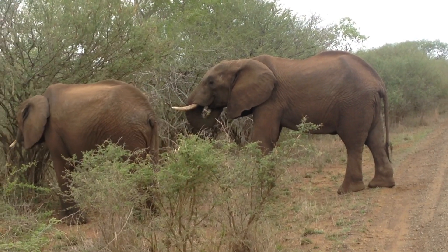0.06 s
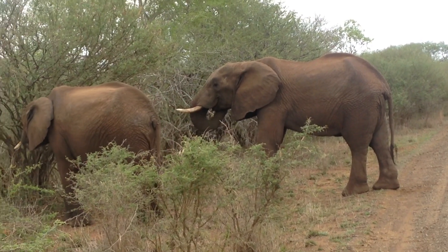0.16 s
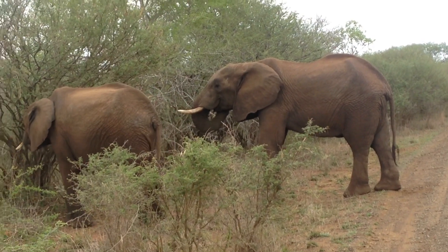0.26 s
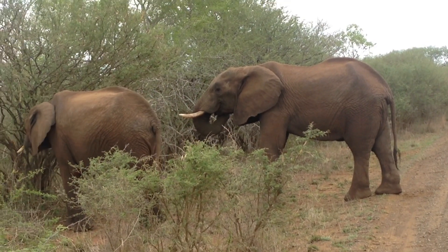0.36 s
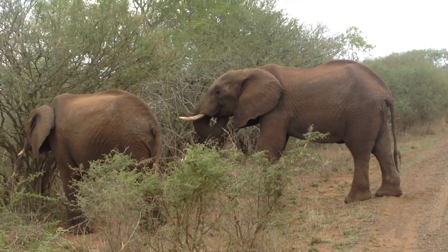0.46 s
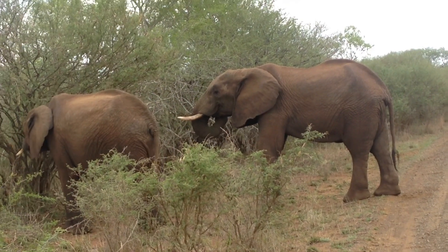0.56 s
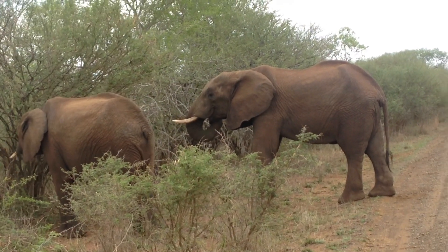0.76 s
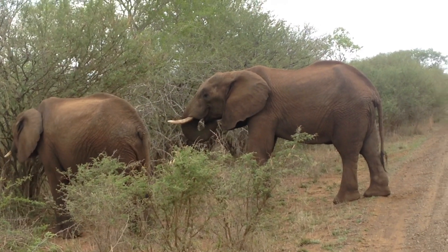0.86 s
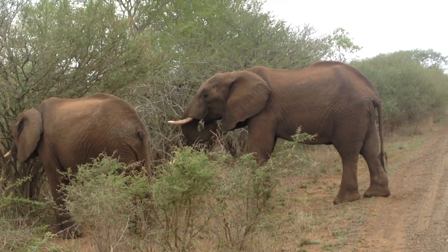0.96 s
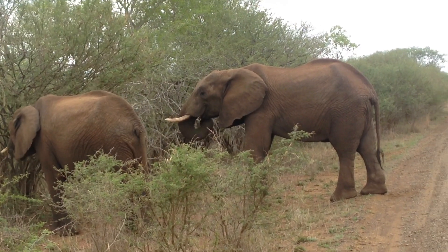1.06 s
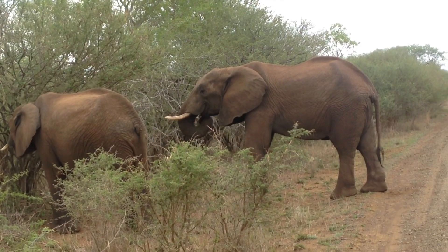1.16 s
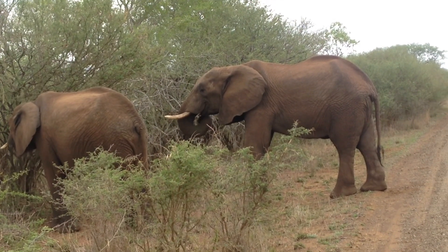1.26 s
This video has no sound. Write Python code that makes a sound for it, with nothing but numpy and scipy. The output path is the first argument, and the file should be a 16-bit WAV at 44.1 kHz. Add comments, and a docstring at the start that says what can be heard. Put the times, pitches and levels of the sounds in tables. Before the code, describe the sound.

Dry twigs crack and foliage rustles around elephants, with soft wind on the microphone.

```python
"""In dry thorn bush, elephants push through: twigs snap, and leaves rustle as the branches spring back.
Each snap is a crack and a splintering that rings the wood; rustle and tearing bark are dense ticks over
hiss. Soft low buffets of air hit the microphone, over a faint hiss of wind and a far bird's run of
rising chirps. Stems and ground scatter the snaps and the chirps."""
import sys
import numpy as np
from scipy import signal
from scipy.fft import rfft, irfft
from scipy.io import wavfile

SR = 44100
rng = np.random.default_rng(int(sys.argv[2]) if len(sys.argv) > 2 else 0)


def log_audio(samples):
    """Write samples as a 16-bit WAV file to the path given in sys.argv[1]."""
    # one column per channel
    frames = np.atleast_2d(samples).T
    # limit to full scale, then quantise
    limited = np.clip(frames, -1, 1)
    pcm = np.round(limited * 32767).astype(np.int16)
    wavfile.write(sys.argv[1], SR, pcm)


N = 57330
T = np.arange(N) / SR
HZ = np.maximum(np.arange(N // 2 + 1) * SR / N, 1)


def from_db(db):
    """Decibels to gain."""
    return 10 ** (np.asarray(db) / 20)


def rms_one(x):
    """Scale to unit rms."""
    return x / np.sqrt(np.mean(x ** 2) + 1e-20)


def filtered(x, kind, hz, order=2):
    """Butterworth filter."""
    return signal.sosfilt(signal.butter(order, np.clip(hz, 10, .45 * SR), kind, fs=SR, output="sos"), x)


def coloured(x, spectrum):
    """EQ a steady sound with a curve of (frequency [Hz], level [dB]) points; rms 1."""
    hz, db = np.transpose(spectrum)
    gain = from_db(np.interp(np.log(HZ), np.log(hz), db))
    return rms_one(irfft(rfft(x) * gain, N))


def even_noise(gain):
    """Noise shaped by a gain per frequency, with its swells evened out; rms 1."""
    analytic = signal.hilbert(irfft(rfft(rng.standard_normal(N)) * gain, N))
    levelled = analytic.real / (abs(analytic) + 1e-12)
    return rms_one(irfft(rfft(levelled) * np.sqrt(gain), N))


def add(out, s, sound):
    """Mix a sound in at s seconds."""
    i = int(max(s, 0) * SR)
    out[i:i + len(sound)] += sound[:max(N - i, 0)]


def crackle(envelope, spectrum, ticks_per_s, spread_db, hiss):
    """Dense ticks of uneven size over a friction hiss, riding a level envelope."""
    sizes = rng.choice([-1, 1], N) * from_db(spread_db * np.minimum(rng.exponential(1, N), 4))
    ticks = (rng.random(N) < ticks_per_s / SR) * sizes
    texture = coloured(rms_one(ticks) + hiss * rng.standard_normal(N), spectrum)
    return texture * from_db(np.interp(T, *np.transpose(envelope)))


def wind():
    """Wind in the far bush: a steady bed of faint hiss and low rumble."""
    # colours of the hiss and the rumble: (frequency [Hz], level [dB])
    hiss_colour = [(150, -62), (250, -9), (434, -2.5), (635, -6), (1180, -10.5), (2090, -10), (2750, -13),
                   (3210, -10), (13900, -24.5), (15400, -24)]
    rumble_colour = [(20, -14), (40, -10.5), (65, 2.5), (100, -13), (160, -16.5), (260, -30.5),
                     (500, -29.5), (1500, -51)]
    hiss = from_db(-71.5) * coloured(rng.standard_normal(N), hiss_colour)
    rumble = from_db(-68.5) * coloured(rng.standard_normal(N), rumble_colour)
    return hiss + rumble


def bird():
    """A far bird's short rising whistles, blurred by distance."""
    # the run of chirps: (time [s], level [dB], length [s], starting pitch [Hz])
    chirps = [(0.107, -64.5, 0.028, 2825), (0.175, -68.5, 0.035, 2800), (0.544, -71.5, .028, 2775),
              (0.607, -73, .018, 3310), (0.625, -77, 0.023, 2750), (0.712, -70, .02, 2670),
              (0.785, -65, 0.017, 2803), (0.856, -74, 0.021, 2530), (0.941, -78, 0.026, 2920),
              (1.032, -74.5, 0.02, 2830), (1.133, -75, 0.021, 2780)]
    rise_hz_per_s, blur_hz = 19000, 110
    out = np.zeros(N)
    for s, db, length_s, hz in chirps:
        waver = rms_one(filtered(rng.standard_normal(N), "low", 240))
        t = T[T < length_s]
        pitch = hz + rise_hz_per_s * t + blur_hz * waver[:len(t)]
        envelope = np.sqrt(2 * np.sin(np.pi * t / length_s))
        add(out, s, from_db(db) * envelope * np.sin(2 * np.pi * np.cumsum(pitch) / SR))
    return out


def buffets():
    """Each eddy swells and fades in a few slow pressure swings, with finer turbulence above them."""
    # eddies hitting the microphone: (peak time [s], level [dB], half length [s], pitch [Hz])
    eddies = [(0.033, -62.5, 0.023, 88.4), (0.116, -57.5, 0.005, 65), (0.233, -49, 0.0093, 78),
              (0.264, -39.5, 0.013, 78.8), (0.334, -61, 0.011, 106), (.365, -47.5, 0.016, 65),
              (0.401, -44.5, 0.011, 65.5), (0.441, -53, 0.016, 85.5), (0.501, -57.5, 0.027, 92),
              (.548, -46, 0.0078, 106), (.598, -56, 0.016, 74), (0.643, -49, 0.0099, 188),
              (0.675, -35, 0.011, 182), (.678, -40.5, 0.014, 79.8), (0.701, -43, 0.0069, 247),
              (0.72, -36.5, 0.016, 60.4), (0.74, -55, 0.0092, 247), (.765, -47, 0.0064, 181.4),
              (.785, -55, 0.036, 83.5), (0.821, -44.5, 0.0093, 65.8), (0.885, -40.5, 0.0095, 99.4),
              (0.939, -58.5, 0.012, 125), (1.003, -49.5, 0.012, 87.6), (1.034, -68, 0.035, 112.4),
              (1.149, -54.5, .011, 59.6), (1.317, -74, 0.0077, 60.4)]
    width_octaves, turbulence_db, turbulence_top_ratio = 0.44, -8.5, 2.054
    out = np.zeros(N)
    for s, db, half_s, hz in eddies:
        swing = even_noise(np.exp(-.5 * (np.log2(HZ / hz) / width_octaves) ** 2))
        turbulence = filtered(rng.standard_normal(N), "low", hz * turbulence_top_ratio, order=5)
        turbulence = rms_one(filtered(turbulence, "high", 29))
        swell = np.exp(-.5 * ((T - s) / half_s) ** 2)
        out += from_db(db) * swell * (swing + from_db(turbulence_db) * turbulence)
    return out


def bush_scatter(x):
    """Many weak reflections off stems and ground, dying quickly; wet signal only."""
    decay_s, wet_db, top_hz = 0.011, -6.5, 8950
    t = T[:SR // 5]
    echoes = filtered(rng.standard_normal(len(t)), "low", top_hz, order=1) * np.exp(-t / decay_s)
    return from_db(wet_db) * signal.fftconvolve(x, echoes / np.linalg.norm(echoes))[:N]


def leaf_rustle():
    """Dry leaves and thorns slide past each other."""
    # swells of branches dragging through leaves: (time [s], level [dB])
    drag_envelope = [(0, -79), (.07, -72.5), (.10, -70.5), (.20, -67.5), (.275, -66.5), (.365, -61),
                     (.43, -67), (.49, -67.5), (.53, -66.5), (.59, -75), (.635, -72.5), (.662, -59),
                     (.695, -73), (.85, -78), (.89, -71.5), (1.0, -78.5), (1.2, -87.5), (1.255, -71),
                     (1.3, -85)]
    # colour of dry leaves: (frequency [Hz], level [dB])
    leaf_colour = [(500, -7), (1200, -5.5), (2200, -1.5), (3000, -2.5), (4500, -1.5), (7000, -5),
                   (11000, -10), (15500, -18.5)]
    return crackle(drag_envelope, leaf_colour, ticks_per_s=2500, spread_db=4, hiss=.9)


def bark_tear():
    """Bark and fibres tear in a short, bright rip as the branch gives way."""
    # surges of the rip: (time [s], level [dB])
    tear_envelope = [(.275, -95), (.290, -53.5), (.302, -67), (.312, -55.5), (.334, -66), (.344, -66),
                     (.353, -63), (.362, -53.5), (.385, -58.5), (.41, -64.5), (.44, -83)]
    # colour of tearing fibres: (frequency [Hz], level [dB])
    tear_colour = [(800, -24), (2000, -6), (3000, 0.5), (4800, 6.5), (8000, 2.5), (11000, 0), (15000, -5)]
    return crackle(tear_envelope, tear_colour, ticks_per_s=4000, spread_db=4.5, hiss=0.41)


def twig_snaps():
    """A sharp crack, then fibres splinter for a few milliseconds and ring two modes of the twig."""
    # breaking twigs: (time [s], level [dB], low mode [Hz], its level [dB], high mode [Hz],
    # its level [dB], high cut [Hz], splinter decay [s])
    twigs = [(0.2080, -55, 1910, 0, 4350, 2, 6000, 0.0017),
             (0.2103, -56.5, 1030, 7.5, 1980, 10.5, 4600, 0.002),
             (0.2863, -42, 3970, -9, 6440, -36, 10100, 0.00035),
             (0.2927, -42, 2280, -10, 3950, -10, 10300, 0.00071),
             (0.3067, -49.5, 7500, -21, 10500, 1, 13000, 0.00064),
             (0.3387, -39.5, 4040, -10, 5000, -10.5, 11100, 0.001),
             (0.3410, -44.5, 4200, 2.5, 5400, -1.5, 8050, 0.00066),
             (0.3577, -52, 3750, 0.5, 4970, -0.5, 10000, 0.0031),
             (0.383, -56.5, 2110, 3, 10200, 0.5, 11900, 0.0051),
             (0.4640, -49.5, 3320, 2.5, 3950, 0.5, 5640, 0.0017),
             (0.4664, -62, 3440, -2, 4100, 2, 6000, 0.00047),
             (0.528, -60.5, 2410, -1, 3180, -13, 4700, 0.0094),
             (0.7237, -60.5, 2090, 8, 6130, 5, 6200, 0.0035),
             (0.7406, -63, 2000, 12.5, 5700, 3.5, 5930, 0.0026)]
    crack_decay_s, crack_db, low_cut_hz = 0.00027, -17.5, 1020
    fibre_drive_db = -6   # how hard the splinters drive the modes, against the break itself
    out, t = np.zeros(N), T[:SR // 20]
    for s, db, low_hz, low_db, high_hz, high_db, top_hz, splinter_s in twigs:
        fibres = rng.choice([-1, 1], len(t)) * from_db(rng.normal(0, 1.5, len(t)))
        envelope = np.exp(-t / splinter_s) + from_db(crack_db) * np.exp(-t / crack_decay_s)
        force = rms_one(fibres) * envelope
        snap = force * np.sqrt(SR / 2 / top_hz)   # make-up gain for the high cut
        drive = from_db(fibre_drive_db) * force
        drive[0] += np.linalg.norm(force)   # the break itself: one impulse
        for hz, ring_db in ((low_hz, low_db), (high_hz, high_db)):
            width_hz = 170 + .04 * hz   # higher modes are broader and die sooner
            ring = signal.lfilter(*signal.iirpeak(hz, hz / width_hz, fs=SR), drive)
            snap += from_db(ring_db) * ring * np.sqrt(SR / np.pi / width_hz)
        snap = filtered(snap, "high", low_cut_hz, order=1)
        snap = filtered(snap, "low", top_hz, order=3)   # foliage dulls the top
        add(out, s, from_db(db) * snap)
    return out


def scene():
    """Mono mix: snaps and bird scatter through the bush; leaves, bark and air stay dry."""
    distant = twig_snaps() + bird()
    return (distant + bush_scatter(distant) + leaf_rustle() + bark_tear() + buffets() + wind())[None]


def record(dry):
    """A steep high cut on the whole mix."""
    cutoff_hz = 15300
    return signal.sosfilt(signal.ellip(10, .1, 70, cutoff_hz, fs=SR, output="sos"), dry)


dry = scene()
out = record(dry)
log_audio(out)
```